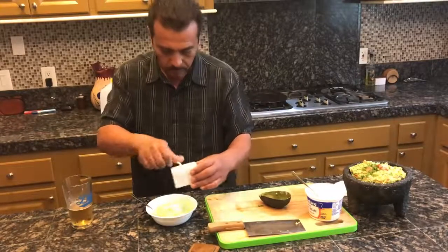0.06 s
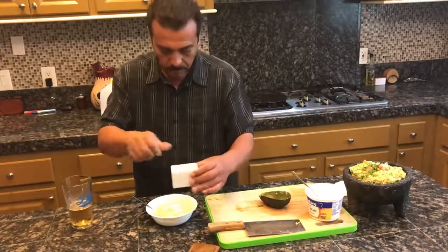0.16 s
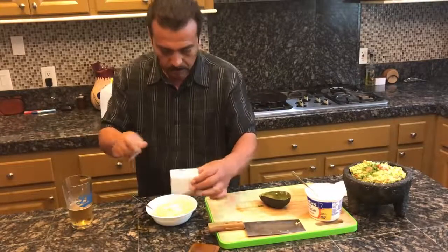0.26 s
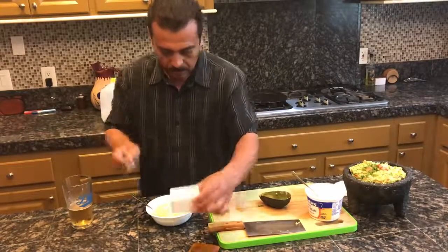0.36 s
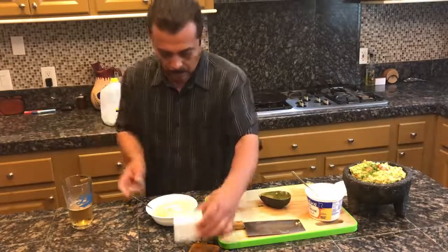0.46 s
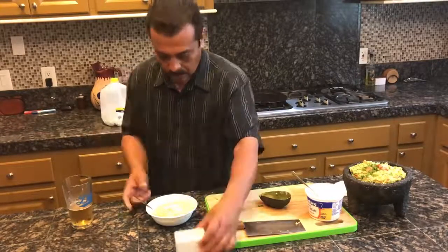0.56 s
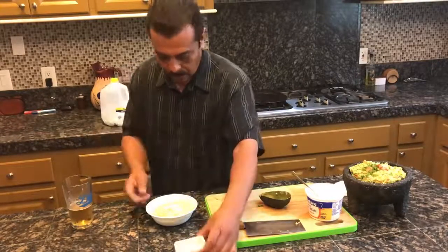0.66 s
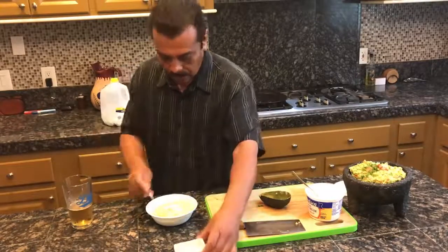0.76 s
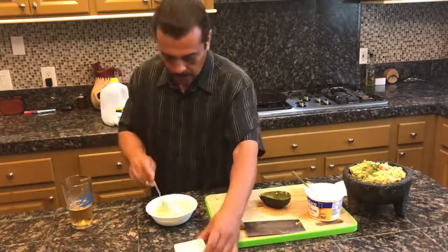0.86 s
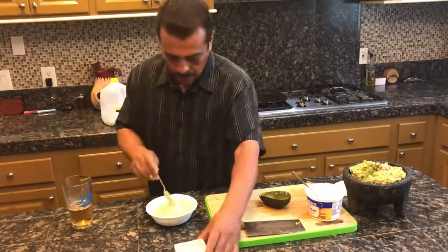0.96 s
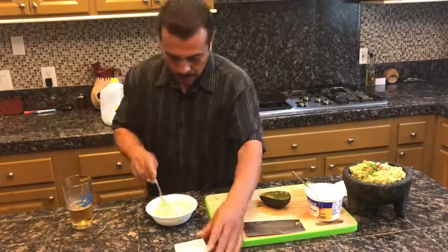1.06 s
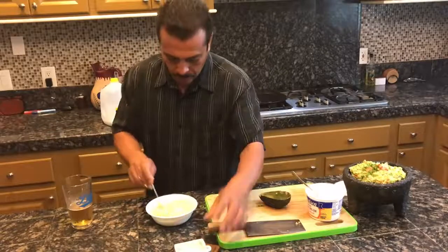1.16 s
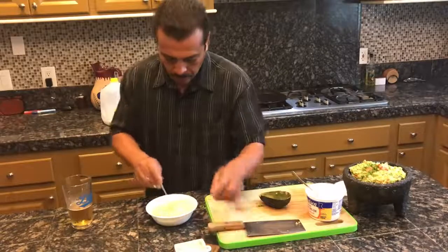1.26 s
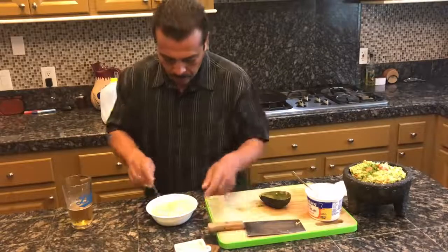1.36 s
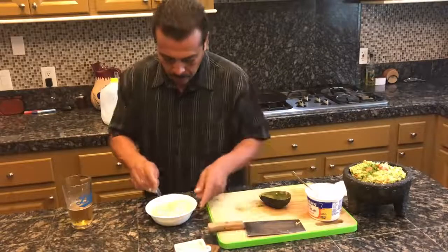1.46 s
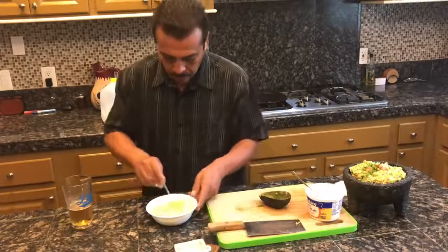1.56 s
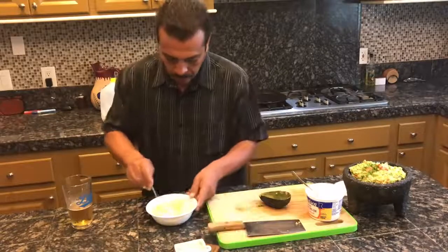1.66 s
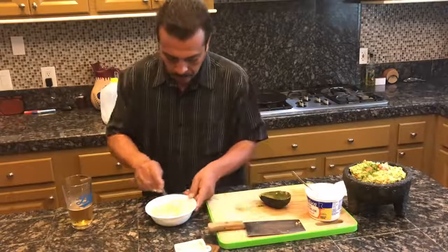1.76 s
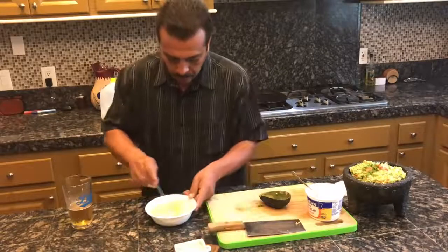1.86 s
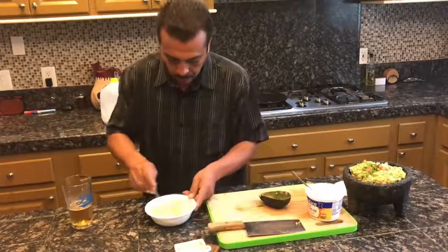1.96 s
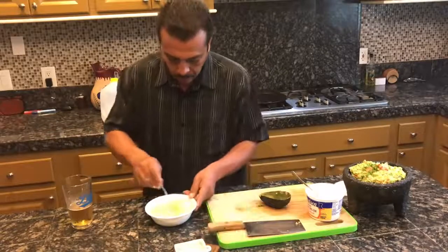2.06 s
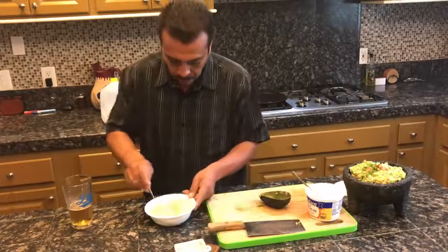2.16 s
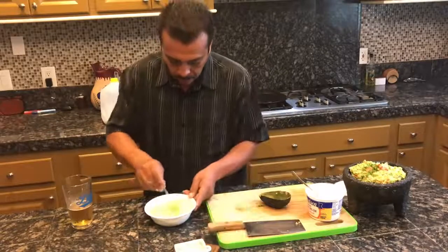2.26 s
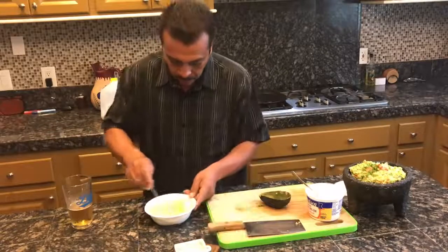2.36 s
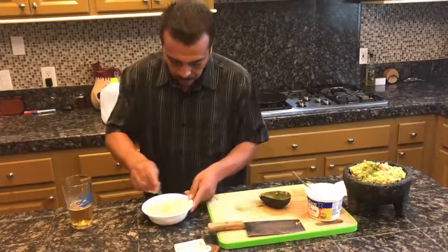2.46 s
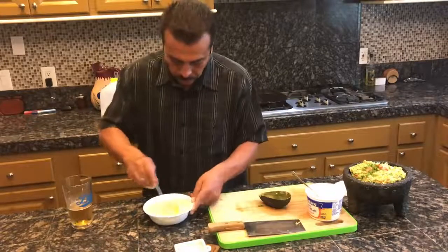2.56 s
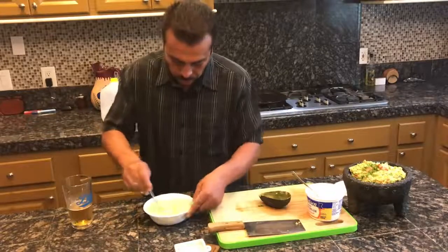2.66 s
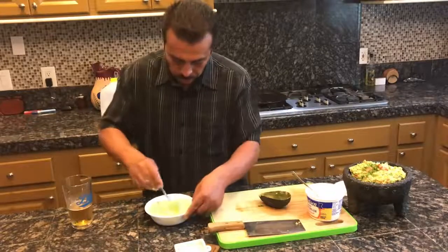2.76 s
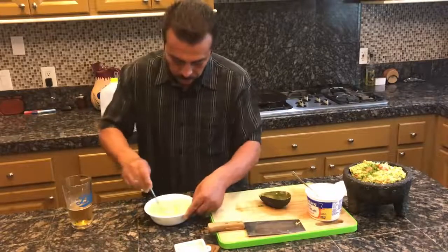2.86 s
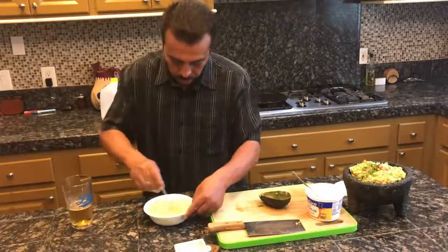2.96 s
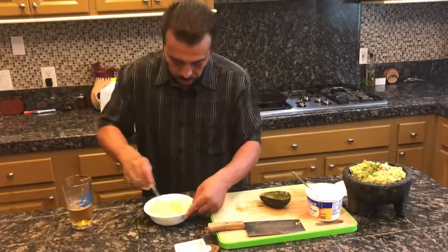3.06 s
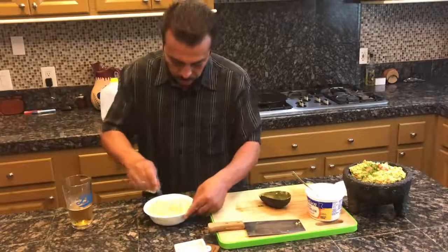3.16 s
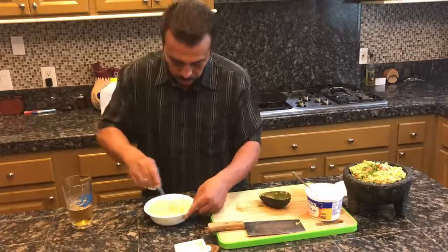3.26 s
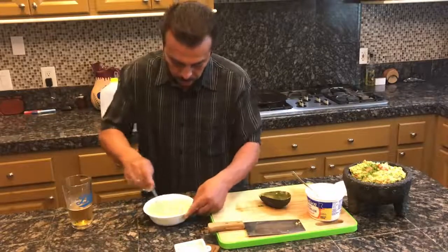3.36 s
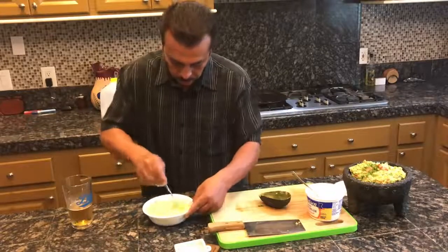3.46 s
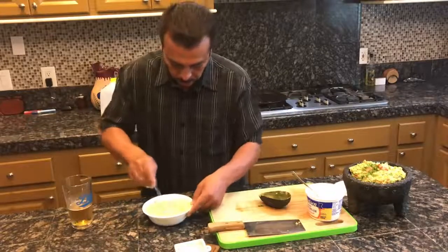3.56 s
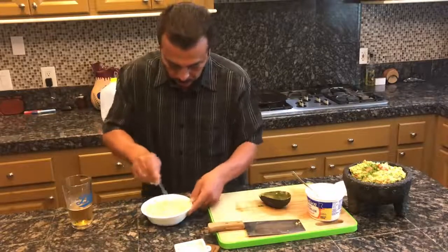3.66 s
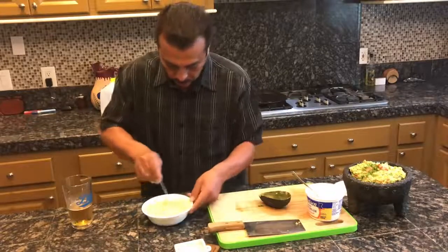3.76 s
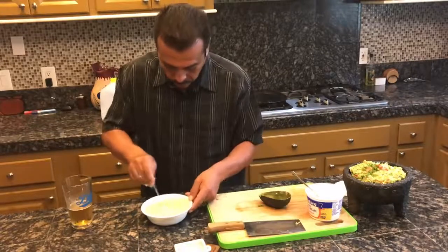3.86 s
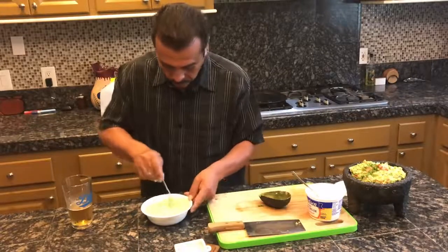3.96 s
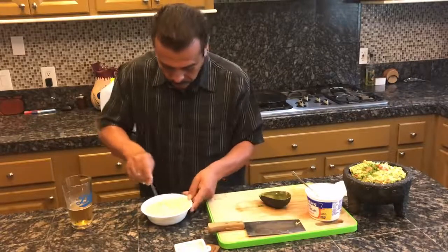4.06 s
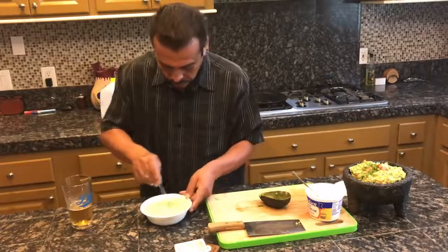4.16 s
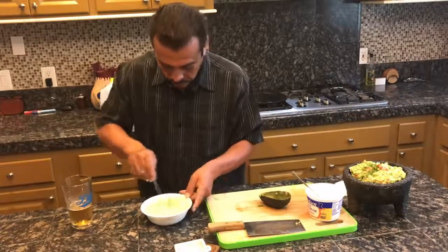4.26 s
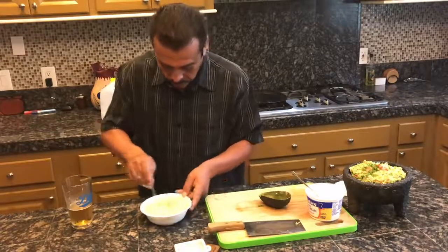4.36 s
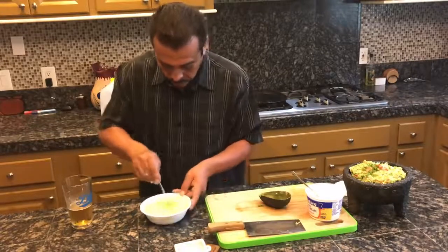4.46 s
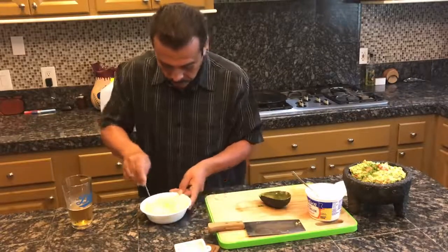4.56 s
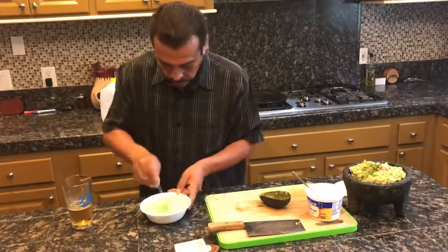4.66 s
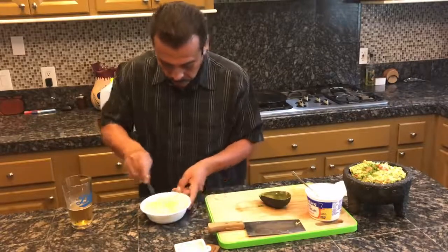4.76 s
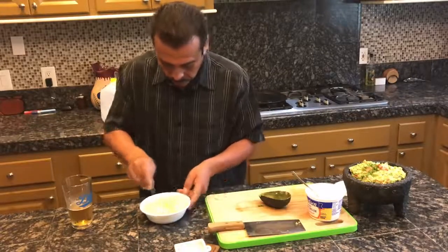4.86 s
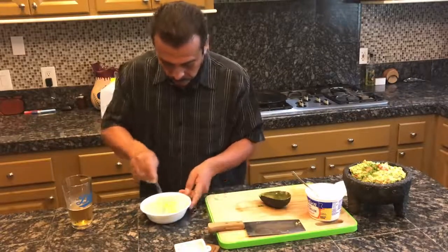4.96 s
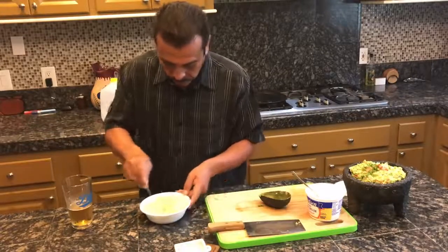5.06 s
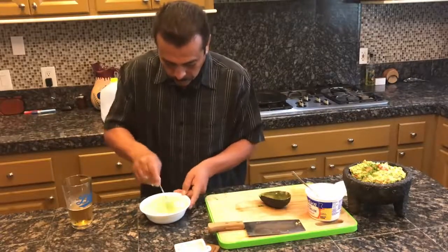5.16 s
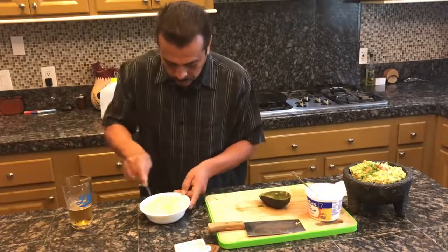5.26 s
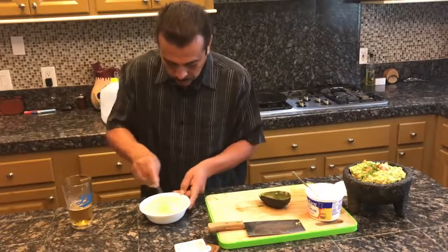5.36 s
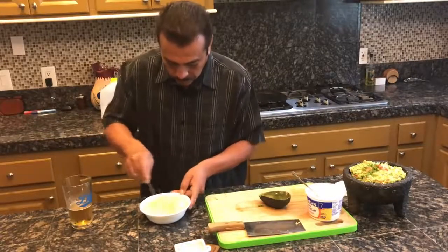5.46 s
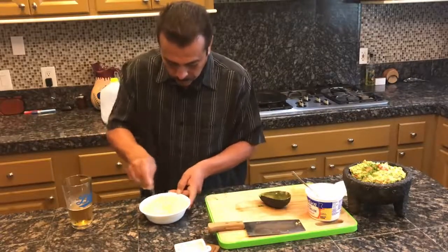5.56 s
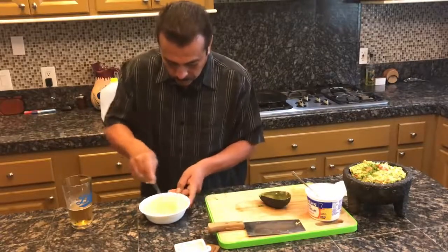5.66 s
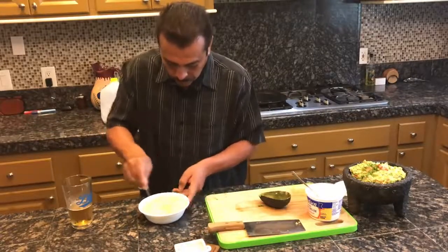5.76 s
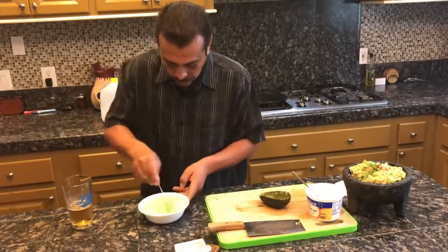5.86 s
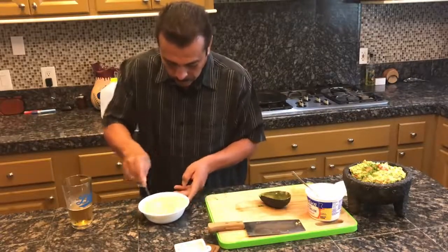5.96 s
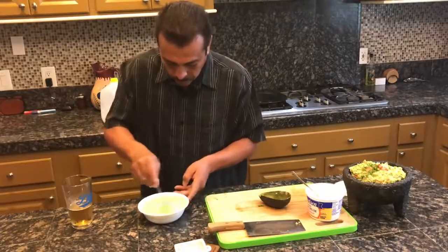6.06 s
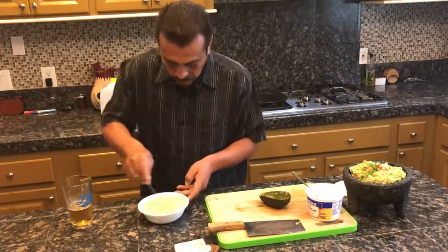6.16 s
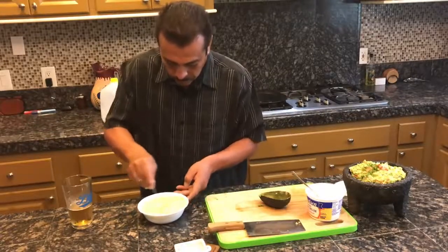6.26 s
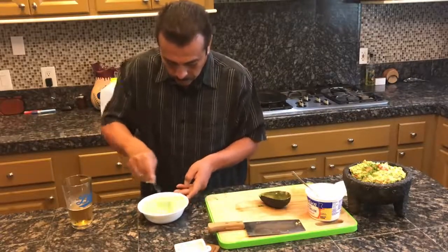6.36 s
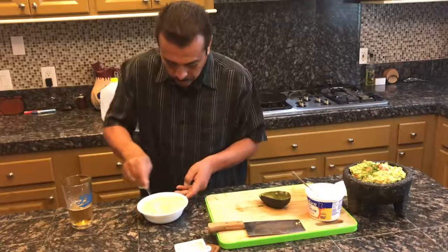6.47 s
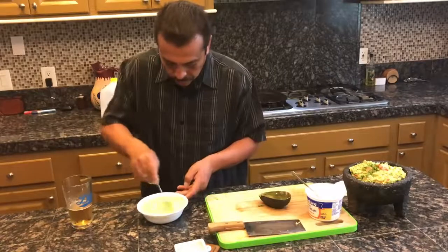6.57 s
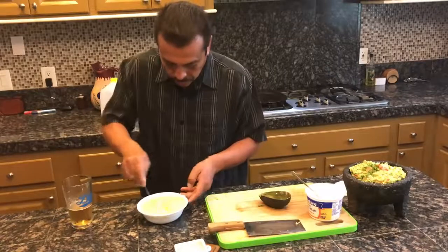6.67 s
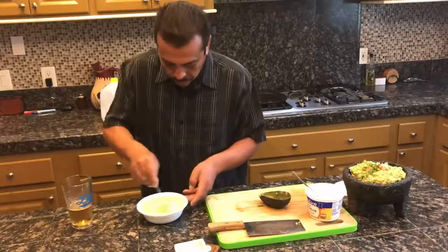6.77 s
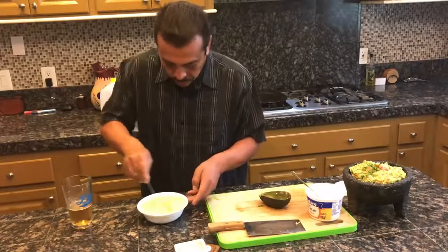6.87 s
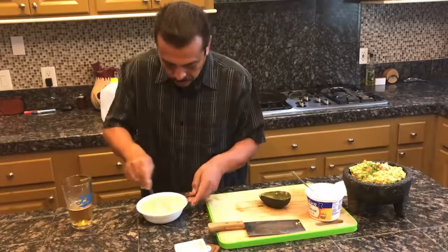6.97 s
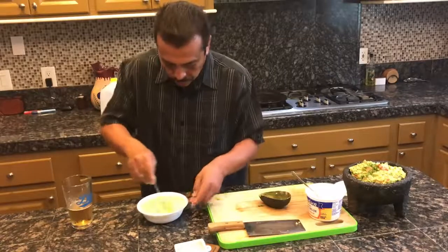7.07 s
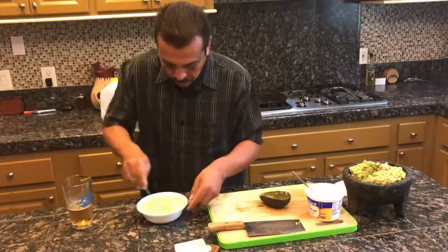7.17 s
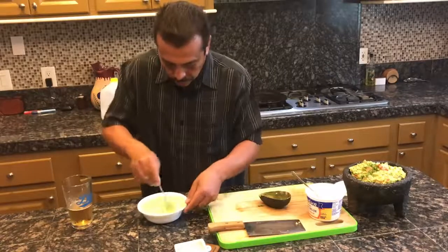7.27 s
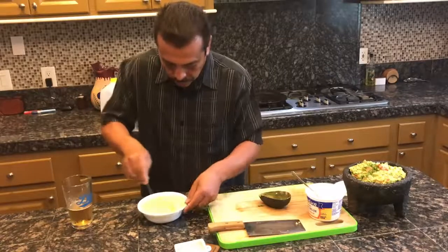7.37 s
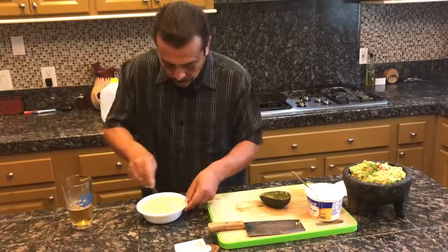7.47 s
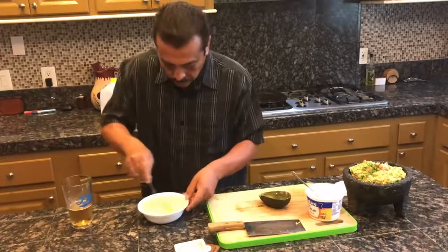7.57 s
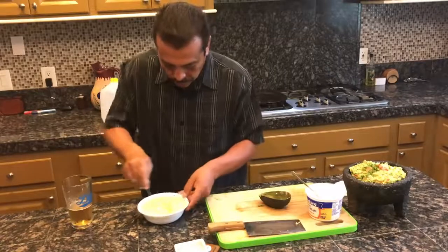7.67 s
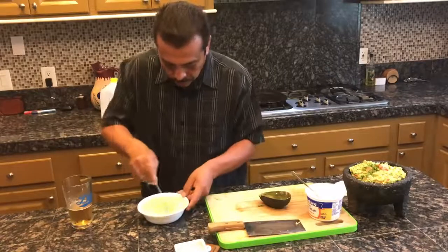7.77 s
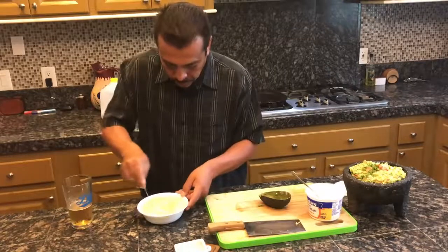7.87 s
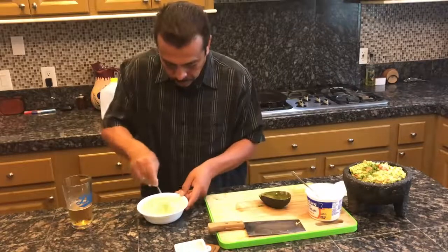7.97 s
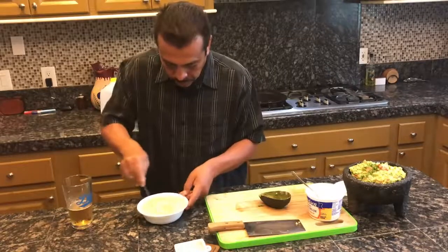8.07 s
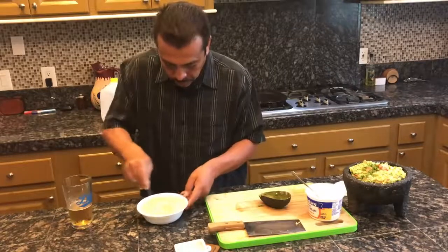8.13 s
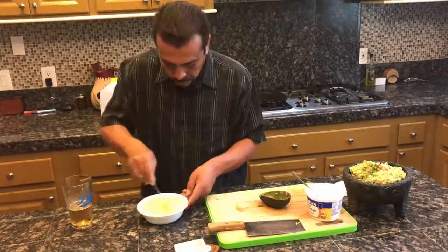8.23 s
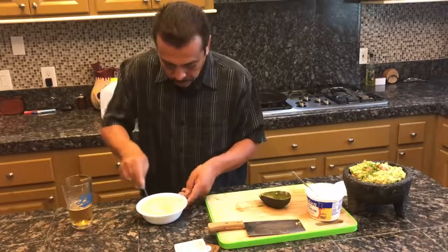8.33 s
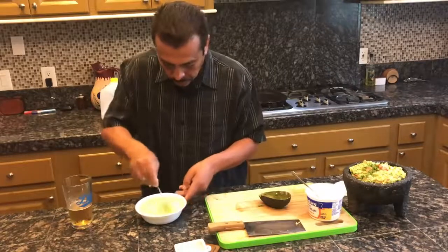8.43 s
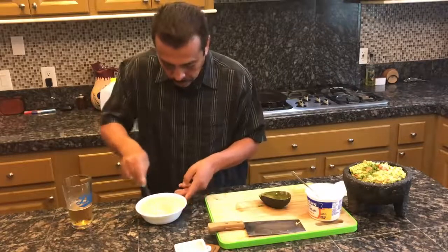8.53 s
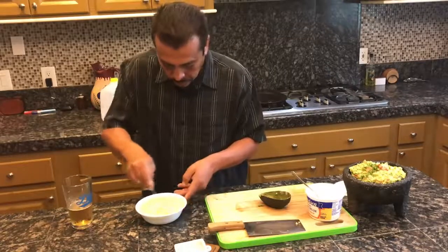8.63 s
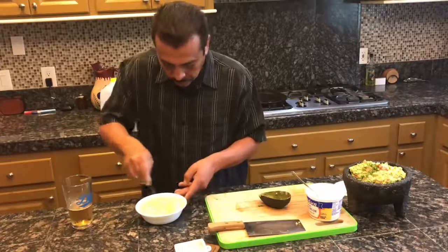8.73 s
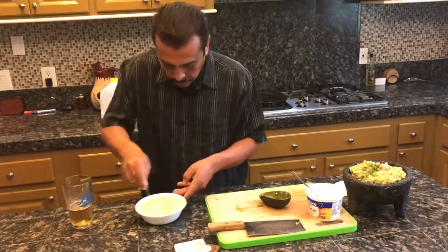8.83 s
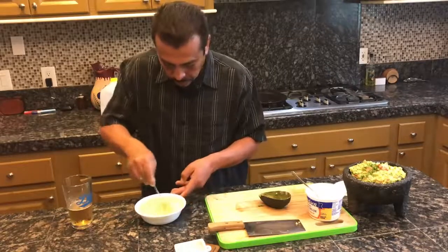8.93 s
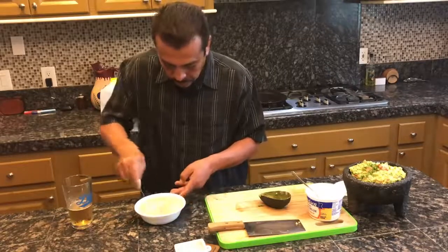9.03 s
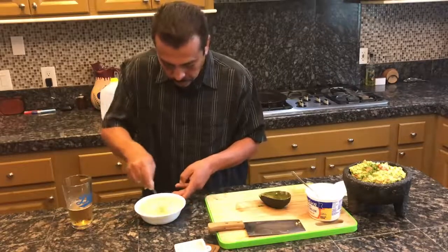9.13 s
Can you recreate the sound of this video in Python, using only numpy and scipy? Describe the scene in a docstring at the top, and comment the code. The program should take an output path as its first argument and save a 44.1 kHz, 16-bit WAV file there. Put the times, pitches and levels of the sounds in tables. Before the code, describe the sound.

In a hard, echoing kitchen, a cup lands bluntly on stone and a spoon stirs cream, knocking the bowl, then turning soft and squelchy.

```python
"""Cup set down, thick cream stirred

Close by in a hard, ringing kitchen: a spoon is taken up, a small cup lands on the stone counter, then the spoon stirs
cream in a ceramic bowl, with knocks about four a second, later gentler. Knocks are damped resonances with dying sines;
stirring is random slips and gliding bubbles; squishes, scrapes and brushes are filtered noise; pops and two light
ticks are short snaps. Behind it lie echoes, a noise tail, booming room modes and a steady rumble and hiss."""
import sys
import numpy as np
from scipy import signal
from scipy.fft import rfft, irfft
from scipy.io import wavfile
from scipy.ndimage import uniform_filter1d

SR = 44100
rng = np.random.default_rng(int(sys.argv[2]) if len(sys.argv) > 2 else 0)


def inscribe(sig):
    """Save sig as 16-bit PCM at rate SR to the path in sys.argv[1].

    A 1-D sig is mono; a 2-D sig holds one channel per row.
    Samples are clipped to [-1, 1] before scaling.
    """
    pcm = np.round(np.clip(np.atleast_2d(sig).T, -1, 1) * 32767)
    wavfile.write(sys.argv[1], SR, pcm.astype(np.int16))


N = 405719  # length in samples

# Borders of the seven registers in Hz; every list of seven levels or shares follows them from low to high.
REGISTER_EDGES_HZ = [60, 250, 800, 1700, 3000, 6000, 9500, 16000]

# Spoon knocking the bowl. Each row: start in seconds, strength in dB, hardness of the contact in dB,
# weight passed to the counter in dB, wall pitch in Hz, rim pitch in Hz.
BOWL_KNOCKS = [(1.6798, -34, -2, 0.5, 1550, 2490), (1.8994, -38.5, 6, 4.5, 1490, 2020),
               (2.1066, -40.5, 4.5, 4.5, 1540, 2200), (2.2344, -40, -38, 11, 930, 2460),
               (2.349, -33, 3.5, 1, 920, 2400), (2.455, -34, -32, 8.5, 810, 2400),
               (2.5461, -41.5, -28, 10, 875, 2400), (2.5647, -30, -12.5, 3, 970, 2120),
               (2.803, -33.5, -12.5, -3.5, 1080, 2340), (2.9165, -46.5, -11, -16, 1480, 1930),
               (3.0859, -33, -3, 0.5, 1080, 2400), (3.3281, -27.5, -10, 2, 1140, 2300),
               (3.6167, -32, -4.5, 0, 1190, 2520), (3.863, -21, -7, -6.5, 1290, 1910),
               (4.1088, -26, -6, -3, 1330, 2820), (4.3357, -31, -2.5, -1, 1230, 2430),
               (4.5107, -36.5, 4.5, 2, 1250, 1900), (4.7153, -41.5, 1, 0, 1180, 2250),
               (5.875, -43.5, -4, -3, 1290, 2000), (6.1307, -38, -4.5, 0, 1330, 1810),
               (6.5488, -45, -5.5, -5, 1460, 1860), (7.0084, -51, 5, -2, 1250, 2300),
               (7.5456, -41, 0.5, 2.5, 1190, 3070), (8.8052, -44.5, -9, -14, 1510, 2050)]
# A plain knock. Each entry: level of one register in dB against the strength.
PLAIN_KNOCK_DB = [-19, -10.5, 1, 1, 0, 1, -2]
# Cream under the spoon takes away the treble. Each entry: share of the hardness that one register follows.
HARDNESS_SHARE = [0.17, 0.019, 0.035, 0.66, 0.78, 0.9, 0.76]
# Each entry: share of the weight that one register follows.
COUNTER_WEIGHT_SHARE = [1, 1, 0, 0, 0, 0, 0]
# Bowl damped by cream and hand, standing on the counter. Each row: mode in Hz, width in Hz, level in dB.
BOWL_MODES = [(98.5, 29, 3), (150, 23, -2.5), (219, 37, 0), (400, 140, 0), (547, 105, 5), (975, 85, -1.5),
              (1370, 250, -4.5), (2034, 400, -7), (2590, 69, -1.5), (3270, 780, -4), (3940, 630, -15),
              (4440, 390, -8), (5180, 340, -9.5), (6350, 540, -1.5), (7290, 640, 0), (8360, 710, 0),
              (9450, 880, -8.5), (11540, 610, -5.5), (13700, 1100, -13.5)]
# A firm knock is over at once, a gentle one slides on. Each row: strength in dB, mean contact delay in seconds.
CONTACT_SMEAR = [(-47, .0016), (-39, .0008)]
# The strongest blows lose their very top. Each row: strength in dB, upper edge in Hz.
KNOCK_TOP_EDGE = [(-29, 21000), (-21, 12000)]
RIM_GAIN = 1.4  # dB on the rim's note per dB of hardness above 0
# Held spoon, a close cluster of modes. One row: centre in Hz, spread to either side in Hz, t60 in seconds.
HELD_SPOON_RING = (4320, 310, .033)
# The grip damps the spoon. Each row: time in seconds, ring in dB against strength plus hardness.
SPOON_GRIP = [(1.7, 0.5), (2.1, -5), (2.35, 3.5), (3.1, 1), (3.85, -10), (4.5, -5), (6, -11)]
# The spoon's tip grazing the rim. Each row: start in seconds, strength in dB.
RIM_GRAZES = [(5.18, -51.5), (5.639, -49.5), (7.2765, -49), (7.7427, -49.5), (8.4318, -52), (8.8651, -48)]
# Each entry: level of one register of a graze in dB against its strength.
RIM_GRAZE_DB = [-23, -11, -7.5, -2.5, 0, -5.5, -9]
# Pitches of a graze. One row: wall in Hz, rim in Hz.
RIM_GRAZE_HZ = (1230, 3040)

# Pace of the stirring. Each row: time in seconds, strokes done.
STROKE_PACE = [(1.7, 0), (5.03, 14), (5.72, 17), (6.6, 20), (7.84, 25), (8.02, 26), (9.18, 31)]
# How hard the spoon drags through the cream. Each row: time in seconds, level in dB before the layers' own trims.
DRAG_LEVEL = [(1.7, -67), (2.6, -57), (3.3, -70.5), (4.4, -60.5), (5.3, -57.5), (7.4, -58.5), (8.5, -58),
              (9.2, -54.5)]
SQUELCH_SWING_DB, FIZZ_SWING_DB = 1.5, 4.5  # swing to either side within each stroke
# Spectrum of the spoon's slips in the bowl's hollow. Each row: frequency in Hz, relative level in dB per Hz.
SQUELCH_SPECTRUM = [(100, -3), (300, -17), (550, 3.5), (800, -3.5), (1000, 4.5), (1350, -1.5), (1800, -9.5),
                    (3000, -13.5), (4400, -14), (6000, -35.5), (12000, -16.5)]
# Spectrum of fizz and sliding hiss. Each row: frequency in Hz, relative level in dB per Hz.
FIZZ_SPECTRUM = [(1500, -1), (4000, -7.5), (7500, 1), (10300, -7.5), (12000, 1.5), (15500, -16),
                 (17000, -17)]
# Pitches of the slurping bubbles. One row: lowest in Hz, highest in Hz.
SLURP_RANGE_HZ = (835, 3700)
# Pitches of the crackling bubbles. One row: lowest in Hz, highest in Hz.
CRACKLE_RANGE_HZ = (5900, 12800)
# Cream squishing around the spoon, and the spoon's short scrapes after gentle knocks.
# Each row: start in seconds, level in dB, centre of the band in Hz.
SQUISHES_AND_SCRAPES = [(5.01, -66, 1100), (5.6, -53, 1100), (5.68, -54.5, 845), (5.895, -51, 1380),
                        (6.585, -52, 1390), (7.249, -58, 1050), (7.32, -53, 1030), (7.94, -55.5, 1140),
                        (8.42, -56, 1030), (8.659, -59, 1080), (8.811, -46.5, 1980), (8.912, -58, 1000),
                        (9.031, -53, 1380)]

# Louder pops in the cream, after two light ticks before the stirring.
# Each row: start in seconds, snap in dB over 10 ms, hollow body in dB against the snap.
TICKS_AND_POPS = [(1.3755, -56, -8), (1.672, -56, -2), (2.7312, -51.5, -13), (4.7869, -36.5, -8.5),
                  (5.027, -52, 1.5), (5.2521, -50, -19), (5.3622, -50, -7), (5.4542, -51, -4),
                  (5.704, -45.5, -2.5), (5.8113, -50, -5), (5.9453, -44.5, -22), (5.951, -45, -7),
                  (6.205, -48, -5), (6.296, -47, -1), (6.433, -41.5, -7.5), (6.5355, -43, -5),
                  (6.7672, -44, -4.5), (6.911, -45.5, -3), (7.3273, -49.5, -20), (7.3368, -44.5, -5.5),
                  (8.0642, -47.5, -7), (8.3122, -49.5, -13), (9.1335, -43, -10)]
# Small pops once the cream is loose: start in seconds, rate per second, mean snap in dB, hollow in dB against the snap.
LOOSE_S, SMALL_POPS_PER_S, SMALL_POP_DB, SMALL_HOLLOW_DB = 4.8, 3.5, -54, -12
SNAP_HZ, SNAP_SCATTER = 8630, 0.31  # middle pitch of a snap, its scatter as a share to either side

PICKUP_S, CUP_S = .7618, .9044  # when the spoon is taken off the counter, and when the cup lands
# Spoon's handle on the counter. Each row: mode in Hz, width in Hz, level in dB.
HANDLE_MODES = [(110, 49, 0), (178, 56, 2), (620, 240, 0), (2080, 260, 1), (2400, 230, -3.5),
                (3800, 300, -20), (4740, 150, -6.5), (6980, 220, -3), (8900, 640, -10),
                (12470, 1500, -22.5)]
# Each entry: strength of the pickup in one register in dB over 10 ms.
PICKUP_LEVELS_DB = [-40, -44, -45.5, -33.5, -42.5, -44.5, -53]
# Cup on the counter. Each row: mode in Hz, width in Hz, level in dB.
CUP_MODES = [(107, 52.5, 1), (167, 40, -1), (240, 19, -0.5), (447, 37, -4.5), (610, 294.5, -1.5),
             (1010, 153, -7), (1656, 302.5, 2), (2060, 301, 6), (2780, 297, -0.5), (3600, 500, -20),
             (4580, 694, -13), (5660, 904, -22.5), (7030, 1404.5, -16), (8360, 246.5, -3.5)]
# Each entry: strength of the cup's knock in one register in dB over 10 ms.
CUP_LEVELS_DB = [-38, -30, -20, -20.5, -28, -35.5, -65]
# The cup's longer ring. Each row: mode in Hz, level in dB, t60 in seconds.
CUP_CLINK = [(3010, -5, 0.03), (3275, 12, 0.015), (3440, -5.5, 0.027), (3270, -23.5, 0.65),
             (8540, -17.5, .07)]
# Light brushes of spoon and hand on the cup. Each row: start in seconds, hiss in dB, ring in dB,
# t60 of the hiss in seconds.
CUP_BRUSHES = [(0.103, -50, -51.5, 0.22), (0.276, -54, -76, 0.065), (1.106, -49.5, -85, 0.36)]
# The free spoon. Each row: mode in Hz, level in dB, t60 in seconds.
FREE_SPOON = [(1500, 1.5, .07), (1570, 2.5, 0.045), (5800, -12, 0.32), (8360, -3, .3), (10910, -3, 0.14)]

# Decay of the kitchen. Each row: frequency in Hz, t60 in seconds.
KITCHEN_T60 = [(100, 0.18), (300, 0.58), (800, 0.62), (2000, 0.68), (4500, 0.71), (8000, 0.53),
               (14000, 0.38)]
# Strength of the kitchen's tail. Each row: frequency in Hz, level in dB.
KITCHEN_DB = [(60, -19.5), (130, 14.5), (400, 4), (1200, 2.5), (2500, -0.5), (4500, 1.5), (7500, -4.5),
              (14000, -7)]
# First echoes. Each row: delay in seconds, gain before the low-pass.
FIRST_ECHOES = [(.0013, 0.079), (.0062, 0.38), (.0068, 0.039), (0.0163, .22), (0.0183, 0.44)]
# Standing waves above the deep boom. Each row: mode in Hz, level in dB against the boom, t60 in seconds.
STANDING_WAVES = [(230, -6, 0.47), (445, -9.5, 0.49)]
# Spectrum of the room's air. Each row: frequency in Hz, relative level in dB per Hz.
AIR_SPECTRUM = [(15, -54), (25, -39), (64, -7.5), (108, -4.5), (141, -8.5), (170, -11), (190, -13),
                (223, -13), (277, -17.5), (363, -15), (405, -21.5), (503, -19.5), (1260, -25.5),
                (10400, -37.5), (16000, -35.5)]
AIR_DB = -57.5  # rms level
EDGE_HZ = 16300  # upper limit of the recorder


def spoon_clicks(count=12):
    """Hard contacts are bright and set the spoon ringing, heavy ones thud into the counter; grazes only tick."""
    out = np.zeros(N)
    centre_hz, spread_hz, t60 = HELD_SPOON_RING
    cluster = [(hz, 0, t60) for hz in centre_hz + spread_hz * np.linspace(-1, 1, count)]
    for s, db, hard_db, weight_db, wall_hz, rim_hz in BOWL_KNOCKS:
        levels_db = db + np.array(PLAIN_KNOCK_DB)
        levels_db = levels_db + hard_db * np.array(HARDNESS_SHARE)
        levels_db = levels_db + weight_db * np.array(COUNTER_WEIGHT_SHARE)
        add(out, s, bowl_blow(levels_db, db, hard_db, wall_hz, rim_hz))
        grip_db = np.interp(s, *np.transpose(SPOON_GRIP))
        add(out, s, ringing(cluster, db + hard_db + grip_db, spot_db=3.0))
    for s, db in RIM_GRAZES:
        add(out, s, bowl_blow(db + np.array(RIM_GRAZE_DB), db, 0, *RIM_GRAZE_HZ))
    return out


def bowl_blow(levels_db, strength_db, hard_db, wall_hz, rim_hz):
    """The pitches of wall and rim shift with where the spoon lands and how much cream lies there."""
    shifts = 1 + .05 * rng.uniform(-1, 1, len(BOWL_MODES))
    modes = [(hz * shift, width, db) for shift, (hz, width, db) in zip(shifts, BOWL_MODES)]
    modes.append((wall_hz, 200, 0.0))
    # a bare, hard contact brings out the rim's note
    modes.append((rim_hz, 200, -2.5 + RIM_GAIN * max(hard_db, 0)))
    smear_s = np.interp(strength_db, *np.transpose(CONTACT_SMEAR))
    top_hz = np.interp(strength_db, *np.transpose(KNOCK_TOP_EDGE))
    return cut(blow(modes, levels_db, smear_s, spot_db=2.8), top_hz, "low", order=3)


def stirring(rubs_per_s=500, fizz_per_s=900):
    """Tiny slips sound in the bowl's hollow, bubbles slurp and crackle above; all swell with each stroke."""
    t = np.arange(N) / SR
    drag_db = np.interp(t, *np.transpose(DRAG_LEVEL), left=-100)
    stroke = np.cos(2 * np.pi * np.interp(t, *np.transpose(STROKE_PACE)))
    rub = coloured(grains(rubs_per_s, 4.0), SQUELCH_SPECTRUM)
    slurp = bubbles(SLURP_RANGE_HZ, per_s=110, cycles=1.6, spread_db=4.0)
    fizz = coloured(grains(fizz_per_s, 3.0), FIZZ_SPECTRUM)
    crackle = bubbles(CRACKLE_RANGE_HZ, per_s=160, cycles=1.1, spread_db=5.5)
    # low and high layers waver separately
    low_db = drag_db + SQUELCH_SWING_DB * stroke + 2.6 * wander(9)
    high_db = drag_db + FIZZ_SWING_DB * stroke + 4.0 * wander(9)
    low = (amp(-6.5) * rub + amp(-9.5) * slurp) * amp(low_db)
    high = (amp(-14.0) * fizz + amp(-9.0) * crackle) * amp(high_db)
    return low + high


def bubbles(range_hz, per_s, cycles, spread_db, count=16):
    """Bubbles of many sizes, each a few dying cycles that glide up as it opens; rms 1."""
    out = np.zeros(N)
    for hz in np.geomspace(*range_hz, count):
        turns = np.arange(int(6 * cycles * SR / hz)) * hz / SR
        age = turns / cycles
        pip = age * np.exp(-age) * np.sin(2 * np.pi * turns * (1 + 0.02 * age))
        pip = pip / np.linalg.norm(pip)
        out += signal.oaconvolve(grains(per_s / count, spread_db), pip)[:N]
    return evened(out)


def squishes_and_scrapes(rise_s=0.0081, width=0.16, slips_per_s=700):
    """Cream squishing around the spoon, or a short scrape of it: a quick run of slips through a narrow band."""
    out, t = np.zeros(N), np.arange(SR // 6) / SR
    swell = t / rise_s * np.exp(1 - t / rise_s)  # peaks at 1 after rise_s
    for s, db, hz in SQUISHES_AND_SCRAPES:
        slips = rng.standard_normal(len(t)) * (rng.random(len(t)) < slips_per_s / SR)
        band = evened(cut(slips, [hz / (1 + width), hz * (1 + width)], "band"))
        add(out, s, amp(db) * band * swell)
    return out


def ticks_and_pops():
    """Two light ticks before the stirring, then louder pops in the cream with small ones scattered between."""
    out = np.zeros(N)
    for s, snap_db, hollow_db in TICKS_AND_POPS:
        add(out, s, snap_and_body(snap_db, hollow_db))
    # one small pop at a chance moment of each slot
    for slot_s in np.arange(LOOSE_S, N / SR, 1 / SMALL_POPS_PER_S):
        s = slot_s + rng.random() / SMALL_POPS_PER_S
        add(out, s, snap_and_body(SMALL_POP_DB + 2 * rng.standard_normal(), SMALL_HOLLOW_DB))
    return out


def snap_and_body(snap_db, hollow_db, snap_s=.00009, body_hz=2900, body_s=0.00051):
    """A snap in a few uneven jerks, as when a film of cream tears, with a dull, hollow tick under it."""
    t = np.arange(1024) / SR
    hz = SNAP_HZ * (1 + SNAP_SCATTER * (2 * rng.random() - 1))
    tear = rng.standard_normal(len(t)) * np.exp(-t / 0.0017)
    jerks = np.zeros(len(t))
    jerks[[0, *rng.integers(3, 45, 2)]] = 1, *rng.uniform(-.7, .7, 2)
    tick = np.sin(2 * np.pi * hz * t) * np.exp(-t / snap_s)
    snap = signal.fftconvolve(jerks, tick)[:len(t)] + 0.056 * tear
    hollow_hz = body_hz * rng.uniform(0.3, 1.66)
    body = np.sin(2 * np.pi * hollow_hz * t) * np.exp(-t / body_s) + 0.4 * tear
    snap = sized(cut(snap, 6200, "high"), snap_db)
    return snap + sized(cut(body, [1200, 5500], "band"), snap_db + hollow_db)


def counter_knocks(clink_db=-22.5, touch_db=-25.5):
    """The spoon is taken up; then the cup grazes the stone and lands: a blunt knock with a short clink."""
    out = np.zeros(N)
    add(out, PICKUP_S, blow(HANDLE_MODES, PICKUP_LEVELS_DB, smear_s=.0003, spot_db=.5))
    knock = blow(CUP_MODES, CUP_LEVELS_DB, smear_s=.0013, spot_db=.5)
    # the graze is a faint, narrow copy of the landing, 12.5 ms ahead of it
    add(out, CUP_S - .0125, amp(touch_db) * cut(knock, [1500, 2600], "band"))
    add(out, CUP_S, cut(knock, 9000, "low", order=4))
    add(out, CUP_S, ringing(CUP_CLINK, clink_db, spot_db=4.0))
    return out


def brushes():
    """A soft sliding hiss that sets the spoon ringing faintly."""
    out, t = np.zeros(N), np.arange(SR // 2) / SR
    onset = 1 - np.exp(-t / 0.0038)
    for s, hiss_db, ring_db, t60 in CUP_BRUSHES:
        hiss = coloured(rng.standard_normal(len(t)), FIZZ_SPECTRUM) * amp(hiss_db - 60 * t / t60)
        add(out, s, (hiss + amp(ring_db) * ring(FREE_SPOON, t)) * onset)
    return out


def kitchen(x, boom_hz=84, boom_db=8.0, build_s=0.00086):
    """Echoes from counter and cupboards, a dense tail, and a few booming room modes."""
    t = np.arange(SR) / SR
    # sparse random taps, decaying at each frequency's own pace
    taps = rng.choice([-1., 1.], SR) * (rng.random(SR) < 9000 / SR)
    hz, at, z = signal.stft(evened(taps), SR, nperseg=256)
    t60 = read(KITCHEN_T60, hz)[:, None]
    decay = amp(read(KITCHEN_DB, hz)[:, None] - 60 * at / t60)
    equal_energy = np.sqrt(2 * np.log(1000) / (t60 * SR))  # long and short decays carry the same energy
    tail = signal.istft(z * decay * equal_energy, SR, nperseg=256)[1][:SR]
    tail = tail * (1 - np.exp(-(t / build_s) ** 2))
    early = np.zeros(SR)
    for s, gain in FIRST_ECHOES:
        add(early, s, np.array([gain]))
    early = cut(early, 3300, "low", order=1)
    boom = ring([(boom_hz, 0, .45)] + STANDING_WAVES, t) * (1 - np.exp(-t / 0.0053))
    boom = amp(boom_db) * boom * boom_hz / SR * 2
    return signal.fftconvolve(x, tail + early + boom)[:N]


def air():
    """Steady low rumble and hiss of the room, as shaped noise."""
    return amp(AIR_DB) * coloured(rng.standard_normal(N), AIR_SPECTRUM)


def blow(modes, levels_db, smear_s, spot_db):
    """One knock through damped resonances; the spot that is hit decides how much each mode speaks."""
    size = 8192
    hz = np.fft.rfftfreq(size, 1 / SR)
    spots = amp(spot_db * rng.standard_normal(len(modes)))
    power = np.zeros(len(hz))
    for spot, (f, width, db) in zip(spots, modes):
        power += (spot * amp(db)) ** 2 / (1 + (2 * (hz - f) / width) ** 2)
    # little sounds below the lowest register
    steep = (hz / REGISTER_EDGES_HZ[0]) ** 8
    power *= steep / (1 + steep) + 1e-8
    bands = list(zip(REGISTER_EDGES_HZ[:-1], REGISTER_EDGES_HZ[1:]))
    middles_hz = np.sqrt(np.prod(bands, 1))
    for _ in range(4):
        # a smooth tilt brings each register towards its strength over 10 ms
        now = [np.sum(power[(hz >= lo) & (hz < hi)]) * 2 / size / (.01 * SR) for lo, hi in bands]
        lift_db = np.array(levels_db) - 10 * np.log10(now)
        power = power * amp(read(list(zip(middles_hz, lift_db)), hz)) ** 2
    # minimum phase: the sound starts at once and dies away
    log_gain = np.log(power + 1e-20) / 2
    mirrored = np.r_[log_gain, log_gain[-2:0:-1]]
    causal = -signal.hilbert(mirrored).imag[:len(hz)]
    # the chattering contact delays each frequency a little differently
    delay_s = smear_s * evened(uniform_filter1d(rng.standard_normal(len(hz)), size=90)) ** 2
    phase = causal - 2 * np.pi * np.cumsum(delay_s) * SR / size
    return irfft(np.exp(log_gain + 1j * phase))[:size // 2]


def ringing(modes, db, spot_db):
    """The longer ring that a knock leaves; each mode starts at a chance point of its swing."""
    t = np.arange(SR * 3 // 4) / SR
    out = np.zeros(len(t))
    for hz, level, t60 in modes:
        decay = amp(level + spot_db * rng.standard_normal() - 60 * t / t60)
        out += decay * np.sin(2 * np.pi * (hz * t + rng.random()))
    return sized(out * (1 - np.exp(-t / 0.00025)), db)


def ring(modes, t):
    """Sum of dying sines."""
    return sum(amp(db - 60 * t / t60) * np.sin(2 * np.pi * hz * t) for hz, db, t60 in modes)


def grains(per_s, spread_db):
    """Random clicks, a few of them large."""
    at = np.flatnonzero(rng.random(N) < per_s / SR)
    sizes_db = spread_db * np.minimum(rng.exponential(1, len(at)), 3.5)
    out = np.zeros(N)
    out[at] = amp(sizes_db) * rng.choice([-1, 1], len(at))
    return out


def wander(per_s):
    """Smooth chance of rms 1, from low-passed noise."""
    return evened(cut(rng.standard_normal(N), per_s, "low"))


def coloured(x, spectrum):
    """Filters by a spectrum; rms 1."""
    gain = amp(read(spectrum, np.fft.rfftfreq(len(x), 1 / SR)))
    return evened(irfft(rfft(x) * gain, len(x)))


def cut(x, hz, kind, order=2):
    """Causal low-, high- or band-pass."""
    edges_hz = np.clip(hz, 10, SR / 2 - 100)
    return signal.sosfilt(signal.butter(order, edges_hz, kind, fs=SR, output="sos"), x)


def amp(db):
    """Decibels to gain."""
    return 10 ** (np.asarray(db) / 20)


def evened(x):
    """Scales to rms 1."""
    return x / np.sqrt(np.mean(x ** 2) + 1e-20)


def sized(x, db):
    """Gives a short sound the energy of 10 ms at this level."""
    return amp(db) * x * np.sqrt(.01 * SR / (np.sum(x ** 2) + 1e-20))


def read(points, hz):
    """Reads a table on a log-frequency axis."""
    f, value = np.transpose(points)
    return np.interp(np.log(hz + 1), np.log(f), value)


def add(mix, s, sound):
    """Mixes a sound in at time s."""
    part = mix[max(round(s * SR), 0):][:len(sound)]
    part += sound[:len(part)]


def scene():
    """Every source is heard directly and through the kitchen, over the room's air."""
    knocks = spoon_clicks() + counter_knocks()
    knocks = cut(knocks, 43, "high", order=3)  # the heavy counter barely moves in the deep bass
    snaps = ticks_and_pops()
    soft = stirring() + squishes_and_scrapes() + brushes()
    wet = kitchen(knocks + amp(0.5) * snaps + soft)
    return (knocks + snaps + soft + wet + air())[None]


def record(dry):
    """The recorder's band limit, a steep low-pass."""
    lowpass = signal.firwin(255, EDGE_HZ, window=("kaiser", 9), fs=SR)
    return signal.oaconvolve(dry, lowpass[None], "same")


dry = scene()
out = record(dry)
inscribe(out)
```